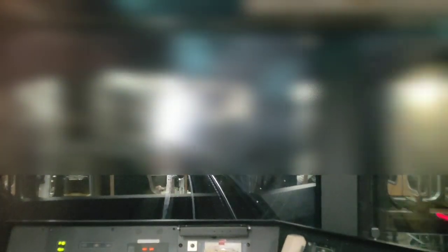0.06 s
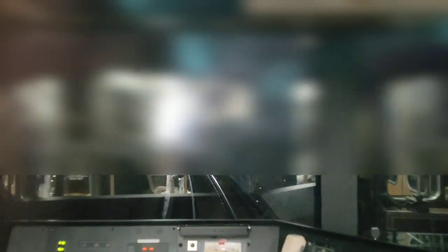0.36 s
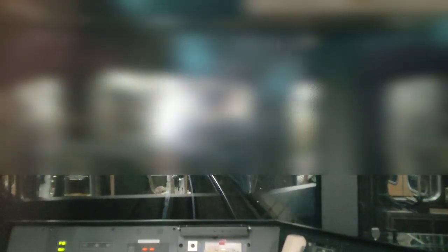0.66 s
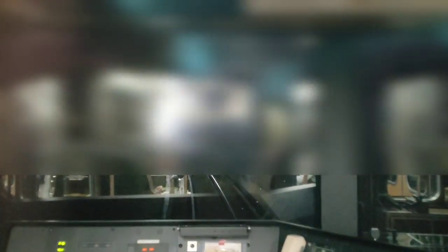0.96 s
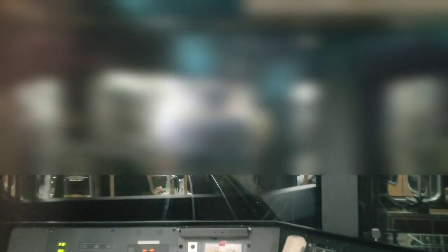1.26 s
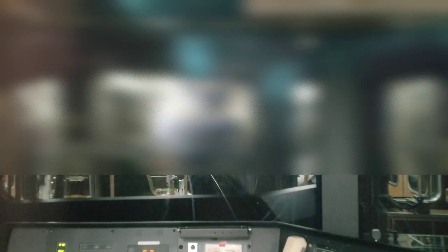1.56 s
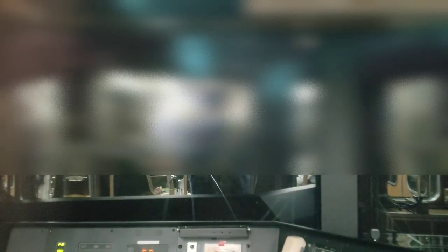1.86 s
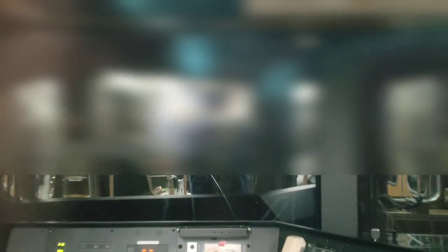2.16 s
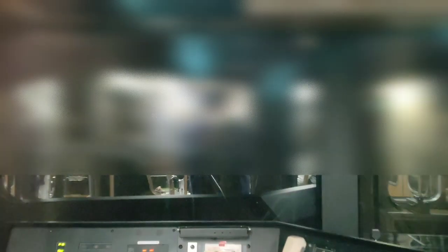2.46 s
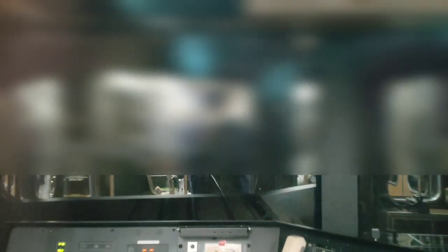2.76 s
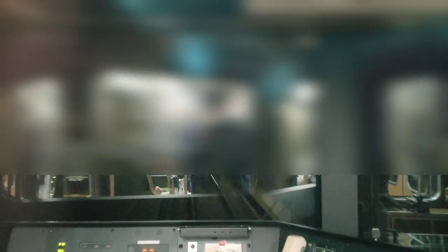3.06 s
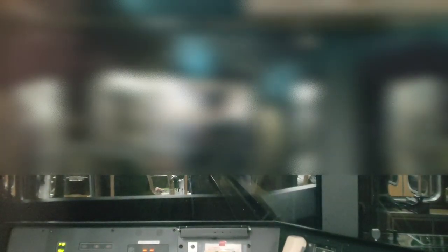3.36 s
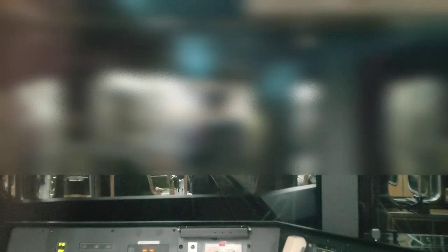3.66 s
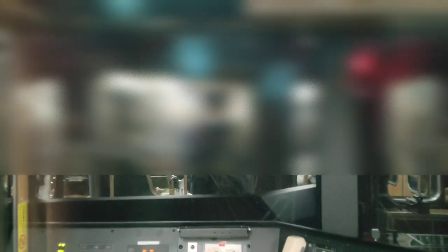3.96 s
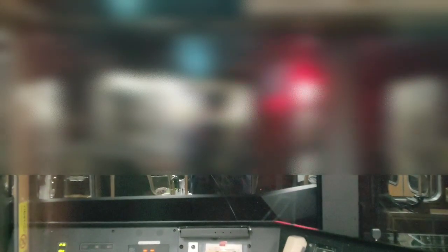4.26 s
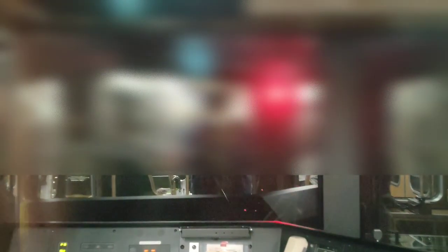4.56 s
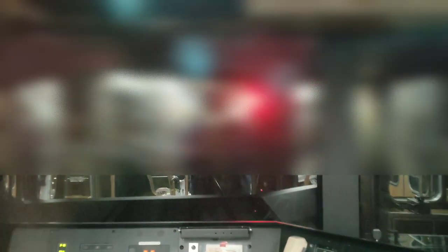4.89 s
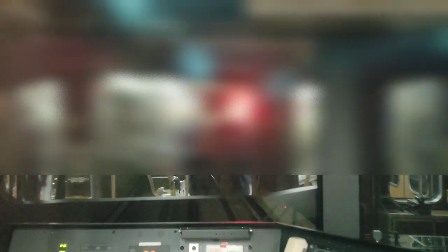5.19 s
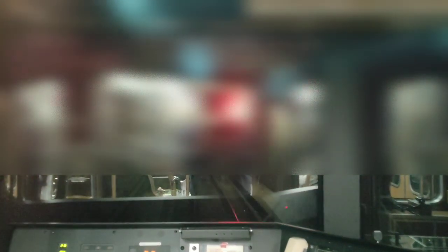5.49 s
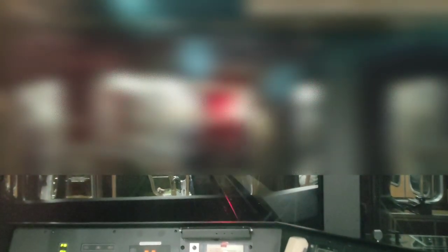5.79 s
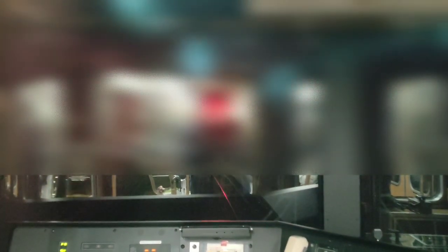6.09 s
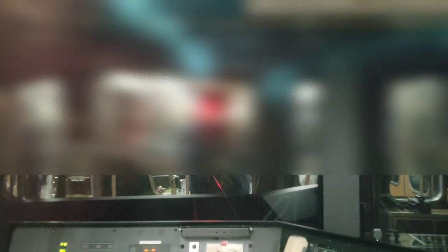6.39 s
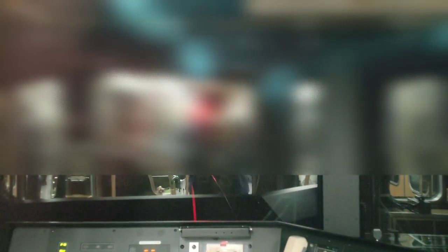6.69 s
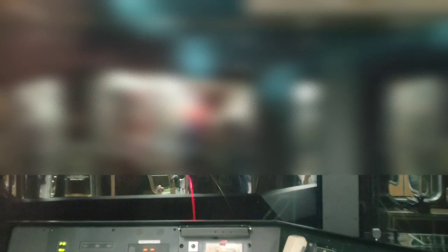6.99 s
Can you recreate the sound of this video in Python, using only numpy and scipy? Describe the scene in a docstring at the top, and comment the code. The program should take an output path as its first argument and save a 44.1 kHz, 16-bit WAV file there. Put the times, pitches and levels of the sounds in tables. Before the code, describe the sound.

Inside the driver's cab of an electric train in a tunnel, the wheels make a loud, continuous rumble. A motor whine creeps up in pitch, sinking under the rumble and returning. The right side is muffled by a finger on the microphone until it comes off with a sharp pop about halfway. The rumble is heavier from there, with brief low thuds and slight distortion, and the finger muffles that side twice more.

```python
"""Wheels of an electric train roll through a tunnel, heard in the driver's cab as it gathers speed.
Rail roughness drives the cab's modes; flanges squeak, rail ripple drones, brief low thuds sound.
The traction motor whines and booms slowly upward, sinking under the rumble and coming back.
A finger covers the right microphone port, comes off with a pop, and slides back over it twice.
Peaks duck a limiter and clip."""
import sys
import numpy as np
from scipy import signal
from scipy.fft import rfft, irfft
from scipy.io import wavfile

SR = 44100
rng = np.random.default_rng(int(sys.argv[2]) if len(sys.argv) > 2 else 0)


def dump(signal):
    """Clip the signal to [-1, 1] and save it as 16-bit WAV at the path in sys.argv[1]."""
    limited = np.clip(np.atleast_2d(signal).T, -1, 1)
    pcm = np.round(limited * 32767).astype(np.int16)
    wavfile.write(sys.argv[1], SR, pcm)


N = 314874
TIME, FREQS = np.arange(N) / SR, np.fft.rfftfreq(N, 1 / SR)

# rolling noise in the cab (frequency [Hz], relative density [dB])
ROLL_SPECTRUM = [(8, -45.5), (85, -45.5), (150, -42.5), (400, -42.5), (600, -50), (950, -55), (1500, -58.5),
                 (2400, -58.5), (3050, -66), (3700, -77), (5300, -78.5), (6800, -92.5), (8700, -93.5),
                 (11000, -104.5), (12800, -109), (15000, -124)]
# resonances of cab air and panels, then wheels and rail (frequency [Hz], width [Hz], lift [dB])
ROLL_MODES = [(18.4, 9.3, 16.5), (109.4, 12.1, 8.5), (131.8, 32, 10.5), (174.8, 15.3, 8.5),
              (213.4, 17, 6.5), (248.7, 23, 9.5), (300, 8.2, -1), (347.4, 25, 4.5), (486.8, 30, 6.5),
              (824, 226, 3.5), (1164, 48, 5.5), (2050, 200, 2), (4690, 880, 6.5)]
# diffuse field at two spaced ports (frequency [Hz], left-right correlation [-])
PORT_CORRELATION = [(100, 0.82), (270, 1), (430, 0.18), (550, -0.19), (680, 0.77), (920, -0.039),
                    (1400, -0.67), (2100, 0.11), (2800, -0.053), (4000, 0.011)]
# track roughness (time [s], level [dB])
ROUGHNESS = [(0, -6), (1.9, -5), (3, -3), (4.1, 0.8), (5.15, 0.1), (6, 0), (6.35, -4.5), (7.14, -1.5)]
# sway, floor boom, panel drone, wheel roar, hiss, fizz (centre [Hz], roughness slope [dB/dB], gain [dB])
ROLL_BANDS = [(35, -0.48, -1), (125, 1.5, 1.3), (283, 0.61, 0.5), (710, 0.4, 0.89), (2200, 0.67, 1),
              (7000, 1.02, -1.5)]
# swells and dips in the rumble, and one short knock (middle [s], length [s], lift [dB], pitch [Hz])
RUMBLE_SWELLS = [(.6, 1, -2.5, 202), (0.548, 0.31, 1.5, 805), (1.5, 1, 2, 800), (1.72, 0.57, -8, 109),
                 (1.97, 0.31, -4, 220), (2.55, 0.68, 2, 260), (2.804, 0.22, 8, 90), (3.234, .07, 4.5, 750),
                 (3.22, 0.12, -7, 160), (3.41, 0.53, 4, 550), (3.88, 1, 4.5, 115), (4.288, 0.16, 4, 430),
                 (4.12, 0.17, -2.5, 201), (4.56, 0.22, 0, 200), (4.73, 0.24, 5, 190),
                 (5.046, .12, 6.5, 200), (5.24, 0.33, -8, 110), (5.28, .3, 6.5, 35), (5.466, 0.31, 4, 190),
                 (6.052, 0.21, -5, 200), (5.473, 0.38, 1.5, 650), (5.726, 0.34, 7, 130),
                 (6.68, 0.55, 1, 450), (6.8, 1, 3.5, 130)]
# wheels scrub sideways and hiss (middle [s], length [s], lift [dB])
WHEEL_SCRUBS = [(1.28, 0.33, 3), (1.48, 0.22, 3.5), (2.54, 0.67, 2), (3.293, .5, 1.4), (4.733, 0.16, 3),
                (4.898, 0.18, 4.5), (5.074, 0.32, 3), (5.742, 0.15, 2.5), (5.913, 0.11, 2.5),
                (6.09, 0.12, 2), (6.58, .35, 1.5), (7, 0.24, 1)]
# motor's main whine (time [s], level [dB])
MAIN_WHINE_LEVELS = [(0, -15.5), (.5, -16), (1.15, -18), (1.45, -22.5), (1.72, -23.5), (2, -16), (2.2, -21),
                     (2.45, -22), (2.7, -33), (3.1, -26), (3.7, -33), (4.15, -32), (4.42, -17.5),
                     (4.85, -36), (5.35, -34), (5.65, -20.5), (5.85, -22), (6, -19), (6.2, -20.5),
                     (7.14, -18.5)]
# its standing wave drifts over the right port (time [s], right re left [dB])
MAIN_WHINE_BALANCE = [(0, 0.5), (4.4, -5), (5.65, 1), (6.55, 5.5), (7.14, -0.5)]
# motor's upper whine (time [s], level [dB])
UPPER_WHINE_LEVELS = [(0, -24.5), (.85, -25), (1.2, -37), (2.1, -37), (2.45, -28), (3.2, -25), (3.7, -32),
                      (4.85, -29), (5.07, -19), (5.4, -27), (5.65, -17), (6.3, -24), (6.8, -18.5),
                      (7.14, -17)]
# gear mesh tone (middle [s], length [s], level [dB])
MESH_SWELLS = [(.4, 1.2, -32), (1.65, 0.46, -28)]
# low drive order through the floor (middle [s], length [s], level [dB])
BOOM_SWELLS = [(.85, .4, -24), (1.42, .6, -16), (2.35, .6, -20), (3.88, .7, -11.5), (4.28, .4, -17),
               (5.53, .35, -18), (5.92, .8, -12.5), (6.75, .8, -19)]
# open right port (frequency [Hz], gain re left [dB])
RIGHT_PORT_RESPONSE = [(40, -3), (210, -4), (450, -3.5), (1000, -2), (2000, -5.5), (3100, -6), (4800, -5),
                       (5800, 6.5), (7500, 5), (11000, 5), (13000, -12)]
# finger on the port (lands [s], leaves [s], leak corner pressed [Hz], leak corner leaving [Hz])
FINGER_TOUCHES = [(-1, 3.963, 52, 120), (5.52, 6.235, 250, 1900), (6.69, 8, 260, 290)]
# finger presses and trembles (middle [s], length [s], lift [dB])
FINGER_NUDGES = [(.92, .25, 7), (1.42, 0.4, 8.5), (2.25, .25, 2), (2.62, .35, 6), (3.4, 1.2, 6)]
# flange grazes the rail, a wheel mode rings (start [s], frequency [Hz], level [dB], length [s])
FLANGE_SQUEAKS = [(0.543, 5200, -41, 0.04), (1.15, 1169, -32, 0.83), (3.887, 5040, -35, 0.052)]
# rail ripple in step with a cab mode (start [s], frequency [Hz], level [dB], length [s])
CAB_DRONES = [(1.05, 246.7, -19.5, 1), (6.45, 176, -19.5, 0.86)]
# brief low thuds (time [s], gain [dB])
LOW_THUDS = [(2.769, -16), (3.381, -9), (4.274, -3.5), (4.861, -3), (5.385, -6.5), (5.463, -6.5),
             (5.565, -10.5), (5.757, -12)]
# what a thud rings with (frequency [Hz], level [dB], decay [s])
THUD_MODES = [(111.2, 0, 0.025), (169.3, -2.5, 0.037), (247.6, -0.5, 0.043), (346, -10.5, 0.014)]
# skin lets go of the port (time [s], pulse level [dB], half width [s], crackle level [dB])
SUCTION_POPS = [(3.9525, -6.5, 0.00014, -38), (3.9621, 9, 0.00009, -27), (3.9650, 1, 0.00014, -32),
                (3.9694, 5, 0.00006, -17), (6.242, -11, 0.000085, -39)]


def gain_of(db):
    """Decibels to amplitude."""
    return 10 ** (np.asarray(db) / 20)


def unit_rms(x):
    """Scale to rms 1."""
    return x / np.sqrt(np.mean(x ** 2) + 1e-20)


def at_hz(table, hz):
    """Spectrum table, interpolated in log frequency."""
    table_hz, values = np.transpose(table)
    return np.interp(np.log(hz + 1), np.log(table_hz + 1), values)


def curve(table):
    """Time table, interpolated per sample."""
    return np.interp(TIME, *np.transpose(table))


def lowpass(hz, order=4):
    """Smooth low-pass gain over FREQS."""
    return 1 / (1 + (FREQS / hz) ** order)


def slow_noise(hz, hop=64):
    """Random motion below hz, rms 1."""
    t = TIME[::hop]
    spectrum = rfft(rng.standard_normal(len(t))) / (1 + (np.fft.rfftfreq(len(t), t[1]) / hz) ** 4)
    return np.interp(TIME, t, unit_rms(irfft(spectrum, len(t))))


def shaped_noise(response, size=N):
    """Noise with the given spectral shape, rms 1."""
    return unit_rms(irfft(rfft(rng.standard_normal(size)) * response, size))


def swell(middle_s, length_s):
    """Raised-cosine bump, 0 to 1."""
    offset_s = TIME - middle_s
    return np.cos(np.pi * offset_s / length_s) ** 2 * (abs(offset_s) < length_s / 2)


def swell_gain(rows):
    """Swells summed in amplitude."""
    return sum(gain_of(db) * swell(middle_s, length_s) for middle_s, length_s, db in rows)


def swell_db(rows):
    """Swells summed in dB."""
    return sum(db * swell(middle_s, length_s) for middle_s, length_s, db in rows)


def ring(age_s, hz, db, decay_s):
    """One struck mode."""
    return gain_of(db) * np.exp(-age_s / decay_s) * np.sin(2 * np.pi * hz * age_s)


def reflections_db(width_hz=18, depth_db=1.0):
    """Crowded cab reflections leave narrow random peaks and dips."""
    lags_s = np.fft.rfftfreq(len(FREQS), SR / N)
    return depth_db * shaped_noise(np.exp(-(lags_s * width_hz) ** 2), len(FREQS))


def band_gains_db(spread_octaves=0.93):
    """Rolling bands follow roughness, swells and scrubs; all but the sway flutter."""
    centre_hz, slope, base_db = np.transpose(ROLL_BANDS)[:, :, None]
    gains_db = base_db + slope * curve(ROUGHNESS)
    for middle_s, length_s, db, hz in RUMBLE_SWELLS:
        nearness = np.exp(-(np.log2(centre_hz / hz) / spread_octaves) ** 2)
        gains_db += db * nearness * swell(middle_s, length_s)
    jolt_db = 0.77 * slow_noise(hz=7)  # bogie shakes floor and panels together
    hiss_db = 0.35 * slow_noise(hz=20) + swell_db(WHEEL_SCRUBS)
    roar_db = 0.5 * slow_noise(hz=22)
    fizz_db = hiss_db + 1.2 * slow_noise(hz=8.3)
    return gains_db + np.array([np.zeros(N), jolt_db, jolt_db, roar_db, hiss_db, fizz_db])


def rolling(base_db=-10):
    """Rail roughness drives the resonances; the two ports hear a partly correlated field."""
    left, independent = rfft(rng.standard_normal((2, N)))
    correlation = np.clip(at_hz(PORT_CORRELATION, FREQS), -1, 1)
    right = correlation * left + np.sqrt(1 - correlation ** 2) * independent
    lift_db = sum(db / (1 + (2 * (FREQS - hz) / width_hz) ** 2) for hz, width_hz, db in ROLL_MODES)
    lift_db += reflections_db() * (1 - lowpass(500))
    field = np.array([left, right]) * gain_of(at_hz(ROLL_SPECTRUM, FREQS) + lift_db)
    field *= 1 - lowpass(5)
    field *= gain_of(base_db) / irfft(field[0], N).std()
    splits = [lowpass(87), lowpass(140, order=8), lowpass(350, order=6), lowpass(1200), lowpass(4500)]
    bands = np.diff(splits, axis=0, prepend=0, append=1)
    return sum(irfft(field * band, N) * gain_of(db) for band, db in zip(bands, band_gains_db()))


def contact_wander(x, depth_db=0.9, patch_hz=180, patch_s=0.13, above_hz=650):
    """The contact point wanders across the tread; high wheel resonances come and go."""
    hz, t, frames = signal.stft(x, SR, nperseg=1024, noverlap=768)
    patches = rng.standard_normal((len(t), len(hz))).T
    for axis, width in enumerate([patch_hz / hz[1], patch_s / t[1]]):
        window = np.expand_dims(np.hanning(round(2 * width) + 3), 1 - axis)
        patches = signal.fftconvolve(patches, window, "same")
    highpass = (hz ** 4 / (hz ** 4 + above_hz ** 4))[:, None]
    frames *= gain_of(depth_db * highpass * unit_rms(patches))
    return signal.istft(frames, SR, nperseg=1024, noverlap=768)[1][:, :N]


def motor(start_hz=387.4, climb_hz_per_s=7.75, ease_s=11.5, waver_hz=0.5, flutter_db=2.4):
    """Whines, boom and gear mesh, locked to a shaft that speeds up ever more slowly."""
    def flutter(hz):
        return gain_of(flutter_db * slow_noise(hz))

    upper_ratio, boom_ratio, mesh_ratio = 1.162, 0.275, 2.818
    main_hz = start_hz + climb_hz_per_s * ease_s * (1 - np.exp(-TIME / ease_s))
    phase = 2 * np.pi * np.cumsum(main_hz + waver_hz * slow_noise(hz=6.3)) / SR
    balance = gain_of([np.zeros(N), curve(MAIN_WHINE_BALANCE)])
    main = gain_of(curve(MAIN_WHINE_LEVELS)) * flutter(hz=15) * balance * np.sin(phase)
    lag_rad = np.array([[0], [1.1]])  # later at the right port
    upper = gain_of(curve(UPPER_WHINE_LEVELS)) * flutter(hz=14) * np.sin(upper_ratio * phase - lag_rad)
    overtone = gain_of(-39) * flutter(hz=8) * np.sin(2 * upper_ratio * phase)
    boom = swell_gain(BOOM_SWELLS) * flutter(hz=6.3) * np.sin(boom_ratio * phase)
    mesh = swell_gain(MESH_SWELLS) * np.sin(mesh_ratio * phase)
    return main + upper + overtone + boom + mesh


def leak_corner_hz(t, open_hz=15000, shut_s=0.12, loosen_s=0.22, leave_s=0.011):
    """Corner of the gap under the finger, which slides on, eases, then snaps off."""
    octaves = np.zeros(len(t))
    for lands_s, leaves_s, pressed_hz, leaving_hz in FINGER_TOUCHES:
        shut = 1 - np.exp(-(np.maximum(t - lands_s, 0) / shut_s) ** 2)
        loose = np.clip(1 + (t - leaves_s) / loosen_s, 0, 1)
        contact = np.clip(0.5 + (leaves_s - t) / leave_s, 0, 1)
        depth_octaves = np.log2(pressed_hz / open_hz) + loose * np.log2(leaving_hz / pressed_hz)
        octaves += shut * contact * depth_octaves
    return open_hz * 2 ** octaves


def right_port(x, port_hz=2500, casing_db=-42):
    """Port colour and two low-pass poles that fall as the gap shuts; a trace passes the casing."""
    padded = np.pad(x, (0, 1024), "reflect")
    hz, t, frames = signal.stft(padded, SR, nperseg=512, noverlap=384, boundary="even")
    hz, corner_hz = hz[:, None], leak_corner_hz(t)
    leak = 1 / (1 + 1j * hz / corner_hz) / (1 + 1j * hz / (port_hz + 2 * corner_hz))
    frames *= gain_of(at_hz(RIGHT_PORT_RESPONSE, hz)) * (leak - gain_of(casing_db))
    return signal.istft(frames, SR, nperseg=512, noverlap=384)[1][:N]


def hand_rumble(base_db=-23, seal_hz=90):
    """The hand passes the cab's shaking into the sealed port."""
    seal = 1 / (1 + (leak_corner_hz(TIME) / seal_hz) ** 2)
    shaking = shaped_noise(lowpass(45, order=2) * lowpass(400) * (1 - lowpass(16)))
    return gain_of(base_db + swell_db(FINGER_NUDGES)) * seal * shaking


def driven_modes(rows, waver_depth, waver_rate):
    """Single modes sing unsteadily; waver depth and rate are fractions of the mode's frequency."""
    out = np.zeros(N)
    for start_s, hz, db, length_s in rows:
        on = (TIME > start_s) & (TIME < start_s + length_s)
        pitch_hz = hz * (1 + waver_depth * slow_noise(hz * waver_rate)[on])
        envelope = gain_of(db) * np.sin(np.pi * (TIME[on] - start_s) / length_s)
        out[on] += envelope * np.sin(2 * np.pi * np.cumsum(pitch_hz) / SR)
    return out


def low_thuds(rise_s=0.0044):
    """Brief low thuds push the rumble toward clipping."""
    age_s = TIME[:SR // 2]
    thud = (1 - np.exp(-age_s / rise_s)) * sum(ring(age_s, *mode) for mode in THUD_MODES)
    out = np.zeros(N)
    for time_s, db in LOW_THUDS:
        out[round(time_s * SR):][:len(thud)] += gain_of(db) * thud
    return out


def finger_pops(crackle_hz=6000, crackle_q=3, crackle_s=0.0009):
    """Peeling skin pops and crackles; the air pocket under it rings and the casing thumps."""
    resonance = 1 / (1 + 1j * crackle_q * (FREQS / crackle_hz - crackle_hz / (FREQS + 1)))
    crackle = shaped_noise(lowpass(12000, order=6) * resonance)
    out = np.zeros(N)
    for time_s, db, width_s, crackle_db in SUCTION_POPS:
        age_s = np.maximum(TIME - time_s, 0)
        suction = -np.exp(-((TIME - time_s) / width_s) ** 2)
        pocket = ring(age_s, hz=800, db=-22, decay_s=0.00089)
        casing = ring(age_s, hz=360, db=-21, decay_s=0.007)
        out += gain_of(db) * (suction + pocket + casing)
        out += gain_of(crackle_db) * crackle * np.exp(-abs(TIME - time_s) / crackle_s)
    return out


def scene():
    """The cab at the open left port and at the right port under the finger."""
    wheels = contact_wander(rolling())
    squeaks = driven_modes(FLANGE_SQUEAKS, waver_depth=0.0158, waver_rate=0.032)
    drones = driven_modes(CAB_DRONES, waver_depth=0.0087, waver_rate=0.046)
    left, right = wheels + motor() + squeaks + drones + low_thuds()
    return np.array([left, right_port(right) + hand_rumble() + finger_pops()])


def record(dry, limit_db=4.5, recover_db_per_s=2.5, cutoff_hz=15800):
    """Per-channel limiter with slow recovery, clipping at full scale, band limit."""
    over_db = np.maximum(20 * np.log10(abs(dry) + 1e-9) - limit_db, 0)
    recovery_db = TIME * recover_db_per_s
    duck_db = np.maximum.accumulate(over_db + recovery_db, axis=1) - recovery_db
    clipped = np.clip(dry / gain_of(duck_db), -1, 1)
    end_fades = signal.windows.tukey(N, 0.001)
    band_limit = signal.ellip(8, 0.05, 60, cutoff_hz, fs=SR, output="sos")
    return signal.sosfiltfilt(band_limit, clipped * end_fades)


dry = scene()
out = record(dry)
dump(out)
```